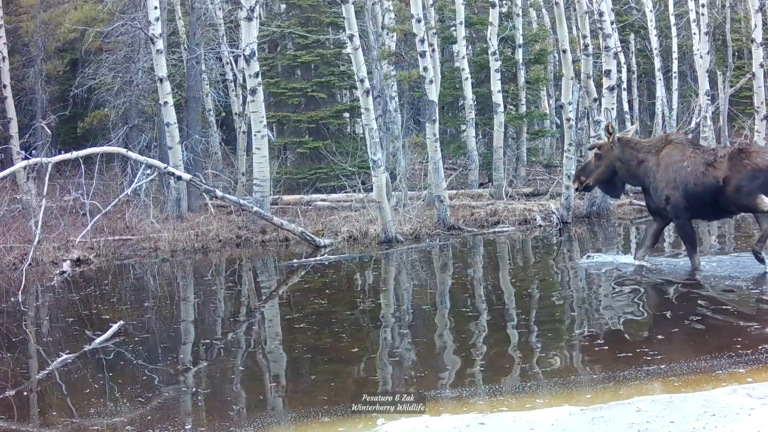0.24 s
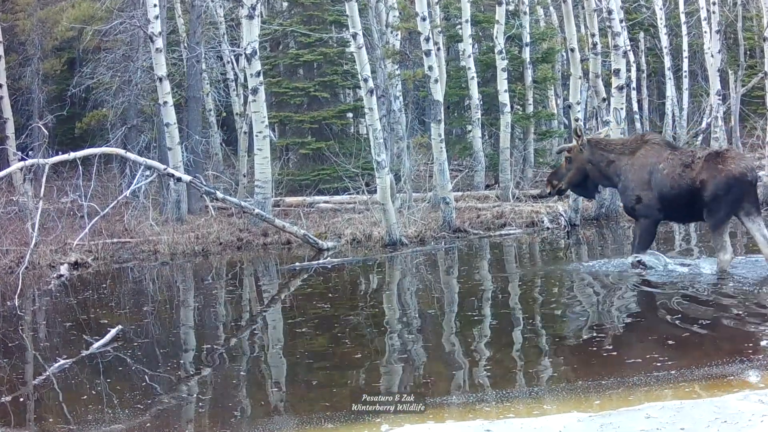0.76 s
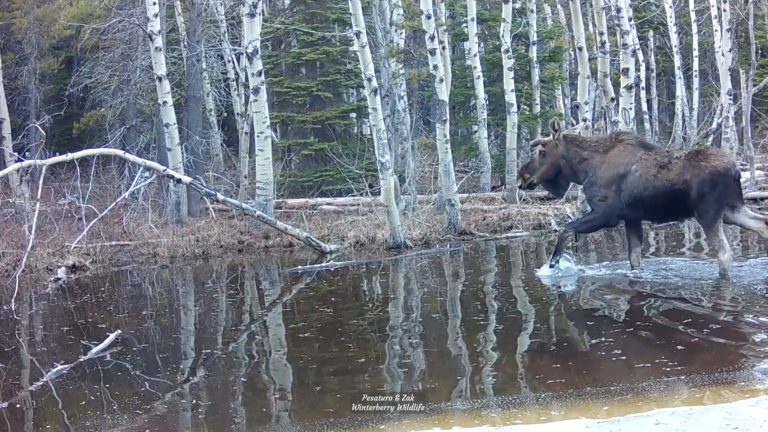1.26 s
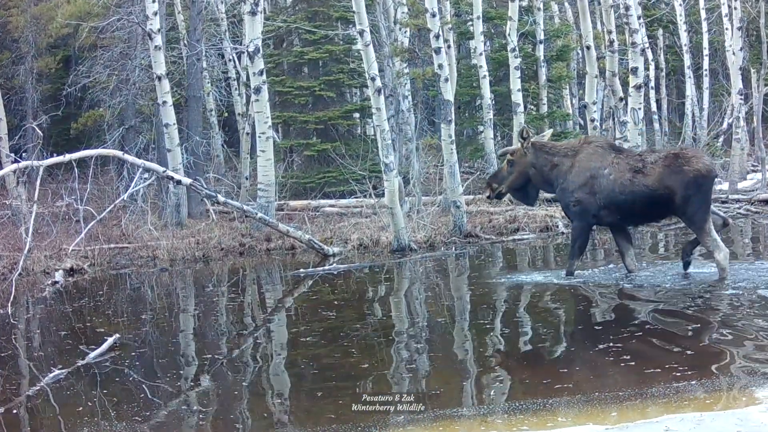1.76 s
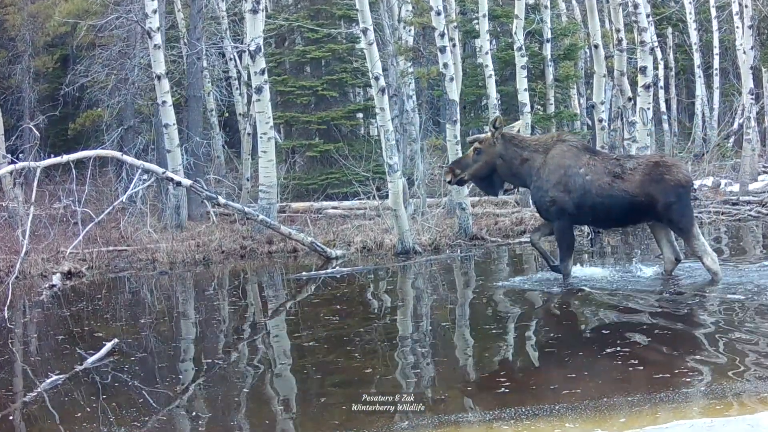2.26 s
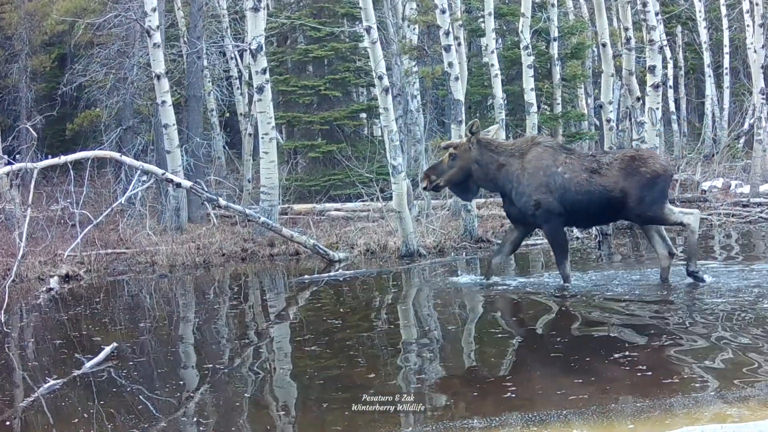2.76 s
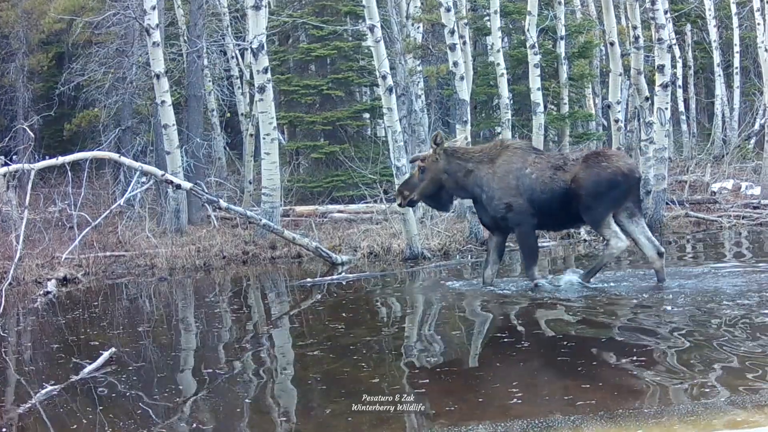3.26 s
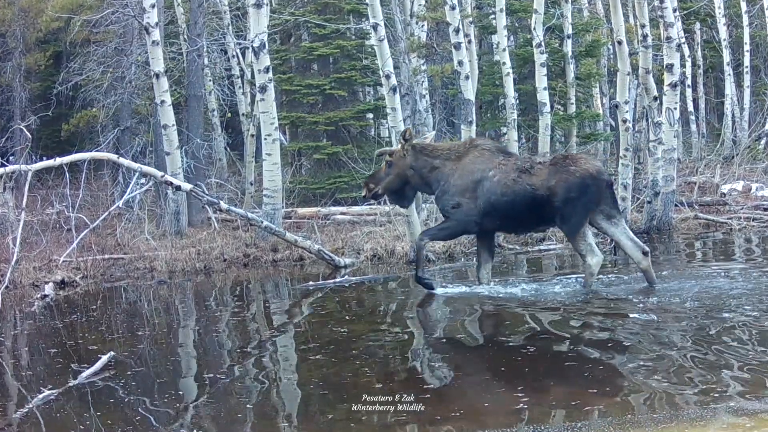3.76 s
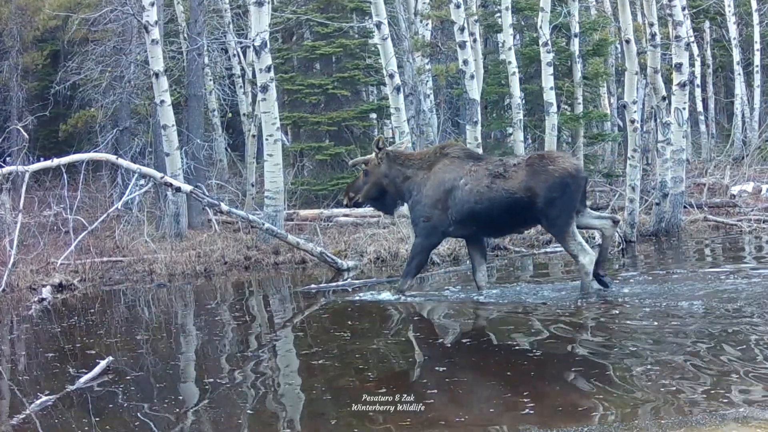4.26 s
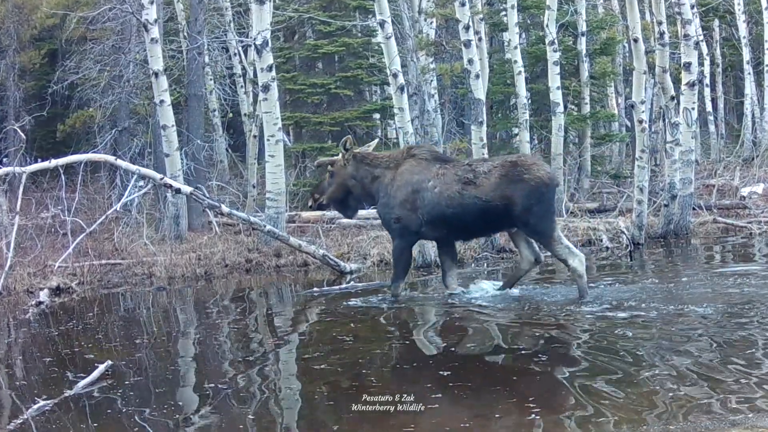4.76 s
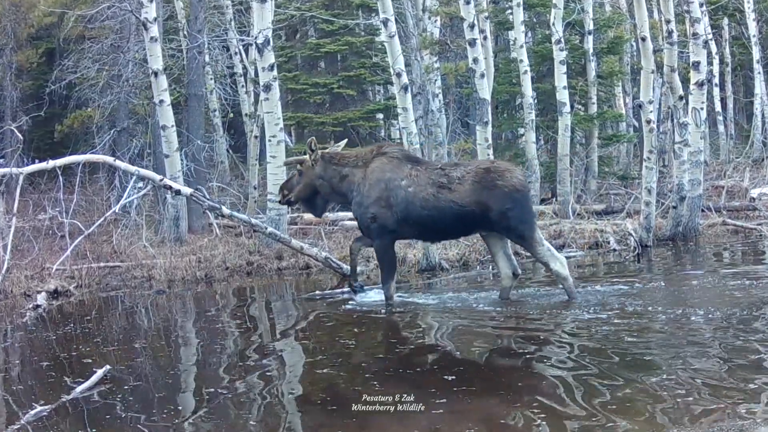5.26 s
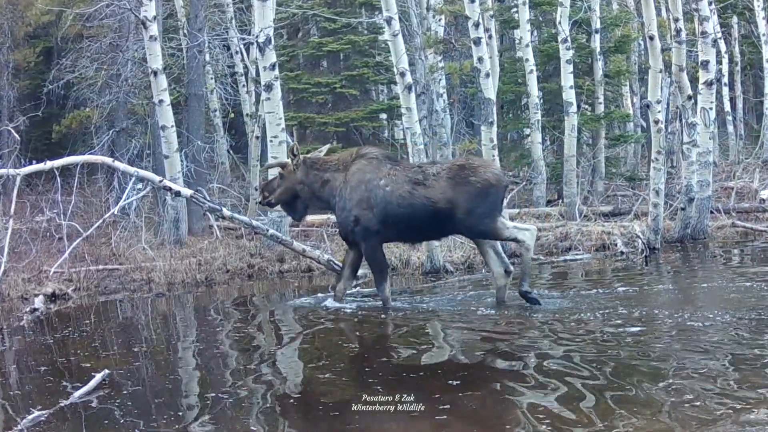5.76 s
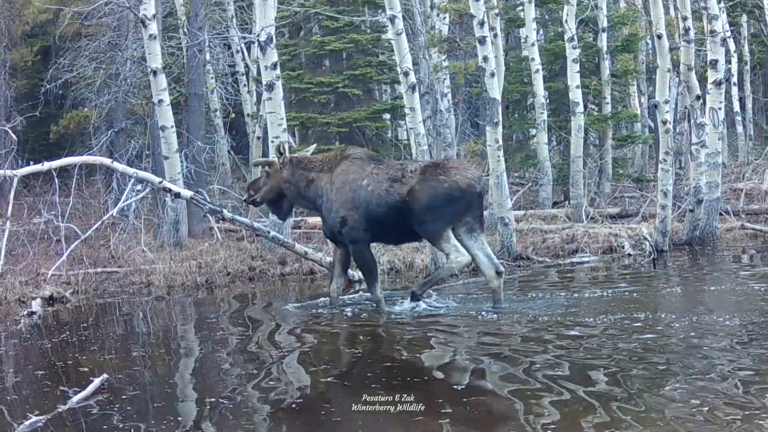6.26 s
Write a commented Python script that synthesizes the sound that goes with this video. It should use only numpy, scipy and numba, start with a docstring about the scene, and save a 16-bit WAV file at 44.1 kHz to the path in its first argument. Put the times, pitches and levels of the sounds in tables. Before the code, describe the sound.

A large hoofed animal wades steadily through shallow woodland water, each leg plunging with bubbly slaps, gurgles and small droplets over faint hiss.

```python
"""Splashing and bubbling: a large hoofed animal wades through a shallow woodland pool.
Legs churn up clouds of bubbles and spray, water slaps back, droplets tick, air pockets gulp shut; every
one of these bubbles is a decaying sine that climbs in pitch, and noise bursts add the crack of each slap.
The small boxed camera microphone stands some metres off: the trees return a short, quieter echo of dense
random reflections that die away, and the housing rings around 1-3 kHz over a faint noise hiss."""
import sys
import numpy as np
from scipy import signal
from scipy.fft import rfft, irfft
from scipy.io import wavfile
from scipy.ndimage import uniform_filter1d
from numba import njit

SR = 44100
rng = np.random.default_rng(int(sys.argv[2]) if len(sys.argv) > 2 else 0)


def to_wav(s):
    """Save 16-bit WAV."""
    ch = np.atleast_2d(s).T  # columns
    pcm = np.round(np.clip(ch, -1, 1) * 32767)  # PCM
    wavfile.write(sys.argv[1], SR, pcm.astype(np.int16))


N = 287091

# Legs plunging in, levels as at the microphone output: (time [s], air pocket level [dB],
# air pocket starting pitch [Hz], big bubbles level [dB], froth level [dB])
LEG_PLUNGES = [(0.127,-61,560,-54,-57), (0.223,-60,353,-46.5,-42), (.47,-56,620,-64,-49.5),
               (0.608,-45.5,690,-52.5,-58), (0.709,-40.5,640,-47.5,-44), (0.915,-42,707,-49.5,-57),
               (1.126,-54,585,-58.5,-44), (1.397,-42.5,532,-47,-67), (1.478,-57.5,370,-54,-57),
               (1.994,-45,710,-46.5,-55), (2.092,-44,690,-52,-47), (2.224,-52,610,-55,-42),
               (2.713,-55,515,-63,-45), (2.779,-66,634,-54,-47), (3.348,-47,770,-55.5,-64),
               (3.423,-47.5,384,-47,-61), (3.449,-45,643,-47.5,-40.5), (4.092,-45,460,-50,-52.5),
               (4.366,-54,300,-55,-56.5), (4.744,-58,770,-61.5,-63), (4.799,-73,594,-63,-49.5),
               (4.818,-51,527,-52,-68), (4.895,-53,434,-51,-45), (5.045,-49,746,-56.5,-49.5),
               (5.329,-53,690,-72,-48), (5.549,-67,660,-57,-49.5), (5.6,-58,457,-54,-47),
               (5.919,-58,630,-59.5,-59), (6.396,-52.5,432,-52,-47.5), (6.46,-68,466,-54,-77)]


def undb(db):
    """Decibels to an amplitude factor."""
    return 10 ** (np.asarray(db) / 20)


def mic_db(hz):
    """Gain in dB of the boxed microphone, interpolated over log frequency."""
    # Microphone in its housing: (frequency [Hz], gain [dB])
    response = np.array([(60, -54.5), (150, -50), (390, -23.5), (540, -14.5), (940, -10), (1060, -7),
                         (1280, -0.5), (1920, 0), (2120, -12.5), (2350, -5.5), (2750, -5.5), (3000, -10),
                         (4000, -20.5), (6300, -34), (10000, -44.5), (13000, -58)])
    return np.interp(np.log(np.maximum(hz, 1)), np.log(response[:, 0]), response[:, 1])


def mic(x):
    """Causal minimum-phase filter with the microphone's gain, built by folding the cepstrum."""
    gain = undb(mic_db(np.fft.rfftfreq(4096, 1 / SR)))
    cepstrum = irfft(np.log(gain))
    cepstrum[1:2048] *= 2
    cepstrum[2049:] = 0
    impulse = irfft(np.exp(rfft(cepstrum)))[:2048]
    return signal.fftconvolve(x, impulse)[:len(x)]


def walk(rate_hz):
    """Random levels held 1 / rate_hz s and smoothed twice over that time; standard deviation 1."""
    hold = int(SR / rate_hz)
    steps = np.repeat(rng.standard_normal(N // hold + 1), hold)
    smooth = uniform_filter1d(uniform_filter1d(steps, hold), hold)[:N]
    return smooth / np.std(smooth)


@njit
def ring(count, start, hz, t60, size, glide, rise):
    """Bubbles: sines that swell over rise cycles, fade 60 dB in t60 s and climb by the fraction glide."""
    out = np.zeros(count)
    for e in range(len(start)):
        span = int(t60[e] * SR) + 1
        phasor = size[e] + 0j
        step = np.exp(2j * np.pi * hz[e] / SR - np.log(1000) / span)  # turn and decay per sample
        climb = np.exp(2j * np.pi * hz[e] * glide[e] / SR / span)
        unswelled = 1.
        swell = np.exp(-hz[e] / SR / rise)
        for i in range(start[e], min(start[e] + span, count)):
            phasor, step, unswelled = phasor * step, step * climb, unswelled * swell
            out[i] += phasor.imag * (1 - unswelled)
    return out


def air_hiss():
    """Faint white noise in the air whose level wanders slowly."""
    level_db = -56 + 1.5 * walk(4.3)
    return rng.standard_normal(N) * undb(level_db)


def trees(x):
    """Trunks and bank scatter back a short diffuse tail: decaying noise of unit energy as echo."""
    echo_t60_s, echo_db, first_return_s = 0.3, -11.5, 0.006
    t = np.arange(int(.4 * SR)) / SR
    tail = rng.standard_normal(len(t)) * undb(-60 * t / echo_t60_s) * (t > first_return_s)
    tail = tail / np.sqrt(np.sum(tail ** 2))
    return signal.fftconvolve(x, tail)[:N] * undb(echo_db)


def drops():
    """A droplet landing ticks with five tiny bubbles of scattered pitch, within 8 ms."""
    # Single droplets landing: (time [s], nominal level at the microphone output [dB])
    landings = [(0.364, -48), (0.467, -45), (1.18, -43.5), (1.25, -48), (1.867, -55), (2.0054, -48),
                (2.1201, -46), (2.441, -41), (2.976, -51.5), (3.055, -51), (3.303, -54), (3.4213, -50),
                (4.802, -52), (4.8805, -51.5), (5.007, -53.5), (5.244, -52.5), (5.306, -55),
                (5.3746, -54.5), (6.3095, -59)]
    t60_s, lowest_hz, octaves, share_db = 0.0033, 3930, 1.5, -2
    s, db = (np.repeat(column, 5) for column in np.transpose(landings))
    pitch, delay = rng.random((len(s), 2)).T
    hz = lowest_hz * 2 ** (octaves * pitch)
    at = ((s + 0.008 * delay) * SR).astype(np.int64)
    size = undb(db + share_db - mic_db(5000))  # one microphone gain for every pitch
    return ring(N, at, hz, t60_s + 0 * s, size, 0.22 + 0 * s, 0.12)


def plinks():
    """Small bubbles pop up clear of the froth: one short climbing ring each."""
    # Lone bubbles: (time [s], nominal level at the microphone output [dB], starting pitch [Hz])
    pops = [(0.2847, -38, 2280), (0.614, -32.5, 2620), (1.1496, -36, 2310), (1.4005, -30.5, 2284),
            (1.8884, -33.5, 2320), (1.9944, -33, 2310), (2.9519, -34.5, 2430), (3.452, -38, 2290),
            (3.831, -31.5, 2680), (4.0949, -29.5, 2840), (4.1802, -37, 2470), (5.698, -38, 2700),
            (5.9803, -44, 2440)]
    t60_s, lift_db = 0.012, 1.5
    s, db, hz = np.transpose(pops)
    at = (s * SR).astype(np.int64)
    size = undb(db + lift_db - mic_db(hz))
    return ring(N, at, hz, t60_s + 0 * s, size, 0.036 + 0 * s, 1.9)


def gulps():
    """A large air pocket closes behind each plunge, rings low and climbs as it rises."""
    s, db, hz = np.transpose(LEG_PLUNGES)[:3]
    at = (s * SR).astype(np.int64)
    t60_s = 27 / hz  # 27 cycles, so bigger pockets ring longer
    return ring(N, at, hz, t60_s, undb(db - mic_db(hz)), 0.5 + 0 * s, 1.0)


def slaps():
    """Each slap traps one main bubble and six neighbours, with a broad crack of spray noise."""
    # Water slapping the surface, as at the microphone output: (time [s], main bubble level [dB],
    # main bubble starting pitch [Hz], spray level against the main bubble [dB])
    slap_table = [(0.0635, -35, 1410, -41), (0.156, -32, 1400, -46), (0.484, -30, 1280, -40),
                  (0.532, -34.5, 1440, -51), (0.6099, -31, 1326, -24.5), (0.7201, -30.5, 1476, -32),
                  (0.7774, -36, 1340, -37), (0.875, -32.5, 1510, -45), (0.8916, -29, 1415, -35),
                  (1.0589, -29, 1160, -53), (1.1162, -46, 1870, -31), (1.154, -31.5, 1300, -26),
                  (1.3996, -21, 1144, -44), (1.477, -33, 1230, -49), (1.5278, -30, 1410, -38.5),
                  (1.5556, -28, 1320, -36), (1.723, -32.5, 1310, -51), (1.8737, -39, 1490, -25.5),
                  (1.998, -28, 1746, -41), (2.0477, -30.5, 1376, -41), (2.1069, -29, 1020, -33.5),
                  (2.2178, -29, 1660, -44), (2.5231, -29, 1460, -42), (2.715, -31, 1580, -45),
                  (2.7836, -33, 1910, -42), (2.8212, -33, 1350, -44), (2.8521, -31.5, 1490, -30),
                  (2.9439, -32.5, 1670, -31), (3.3052, -37, 1635, -22), (3.358, -33, 1750, -27.5),
                  (3.4495, -35.5, 1630, -29.5), (3.4658, -26.5, 1470, -54), (3.4708, -28.5, 1440, -45),
                  (3.6016, -31.5, 1480, -32.5), (4.0077, -42.5, 1470, -45), (4.0948, -28.5, 1170, -32.5),
                  (4.1803, -30.5, 1230, -33.5), (4.2455, -34, 1314, -31), (4.4338, -34, 1410, -43),
                  (4.4884, -35, 1450, -63), (4.747, -38.5, 1240, -42), (4.825, -39, 1440, -25.5),
                  (4.88, -33.5, 1510, -32), (4.897, -32, 1230, -44), (4.9174, -30, 1200, -38),
                  (4.9276, -26, 1370, -44), (5.057, -31.5, 1285, -47), (5.0793, -32.5, 1530, -44),
                  (5.329, -32.5, 1340, -35), (5.528, -31, 1740, -46), (5.5872, -29.5, 1250, -54),
                  (5.6046, -25.5, 1483, -64), (5.629, -34.5, 1360, -49), (5.669, -40, 1640, -47),
                  (5.6872, -34.5, 1625, -32), (5.7342, -35, 1320, -31), (5.777, -49, 1770, -43),
                  (5.789, -40, 1250, -45), (5.805, -43, 1690, -41), (5.837, -39.5, 1500, -45),
                  (5.954, -47, 1400, -50), (6.1225, -49, 1720, -45), (5.93, -40, 1170, -57),
                  (6.1668, -40, 1570, -35), (6.186, -46, 1450, -57), (6.2798, -42.5, 1820, -24),
                  (6.3989, -26, 1296, -40), (6.442, -38, 1470, -36)]
    s, db, hz, spray_db = np.transpose(slap_table)
    t60_s = 0.023 + 0 * s
    at = (s * SR).astype(np.int64)
    main = ring(N, at, hz, t60_s, undb(db - mic_db(hz)), 0.11 + 0 * s, 1.36)

    pitch, delay = np.moveaxis(rng.random((len(s), 6, 2)), -1, 0)
    near_hz = hz[:, None] * 2 ** (2.4 * pitch - 1.3)  # 1.3 octaves below to 1.1 above
    late = at[:, None] + (0.39 * t60_s[:, None] * SR * delay).astype(np.int64)
    size = undb(db[:, None] - 9.5 - 0.88 * delay)  # later ones are weaker
    near = ring(N, late.ravel(), near_hz.ravel(), np.repeat(0.72 * t60_s, 6), size.ravel(),
                0.41 + 0 * size.ravel(), 0.11)

    t, gate = np.arange(N) / SR, 0
    for start, peak_db, fade_s in zip(s, db + spray_db, t60_s):
        fall_db = 60 * np.clip(t - start, 0, 1) / fade_s
        gate = gate + (t >= start) * undb(peak_db - fall_db)
    high_pass = signal.butter(2, 3000, "high", fs=SR, output="sos")
    crack = signal.sosfilt(high_pass, rng.standard_normal(N))
    return main + near + undb(-mic_db(7500)) * gate * crack  # spray level is set at 7500 Hz


def with_plunges(wash_db, peaks_db, fall_db_s):
    """Each plunge adds a quick swell that fades steadily; powers add to the wash. Returns dB."""
    rise_s = 0.0037
    power = undb(2 * wash_db)
    for start, peak_db in zip(np.array(LEG_PLUNGES)[:, 0], peaks_db):
        age = np.clip(np.arange(N) / SR - start, 0, 9)
        swell = (1 - np.exp(-age / rise_s)) ** 2
        power = power + swell * undb(2 * (peak_db - fall_db_s * age))
    return 10 * np.log10(power)


def cloud(heard_db, keep, lo_hz, hi_hz, count, cycles, spread_db, tilt):
    """Bubbles of mixed sizes, about a share keep of count sounding, levelled as at the microphone output."""
    when, pitch, life, luck, lot = rng.random((count, 5)).T
    at = (when * N).astype(np.int64)
    hz = lo_hz * (hi_hz / lo_hz) ** pitch
    # a positive spread makes a few much louder than the rest, a negative one a few much weaker
    size_db = np.minimum(-spread_db * np.log(1 - luck), 2.68 * spread_db)
    size = undb(size_db) * hz ** tilt
    sounding = np.clip(10 * (keep[at] - lot), 0, 1)
    size = size * sounding / np.sqrt(keep[at])  # fewer bubbles are made stronger
    bubbles = ring(N, at, hz, cycles * (.5 + life) / hz, size, 0.27 * life, 0.51)
    return bubbles / np.std(mic(bubbles)) * undb(heard_db)


def churn():
    """Four sizes of bubble; water arrives in clumps, so all surge together; all but the deepest flicker alone."""
    # Water streaming round the moving legs, as at the microphone output:
    # (time [s], froth level [dB], spray level against froth [dB])
    wash = [(0.0, -52.5, -15.5), (.2, -47, -14.5), (0.5, -51.5, -9.5), (0.84, -53.5, -9.5), (.95, -45, -14),
            (1.2, -47, -12.5), (1.361, -51, -12.5), (1.58, -49, -15), (1.851, -52, -12.5),
            (2.3, -51.5, -13.5), (2.45, -49, -10), (2.679, -50.5, -16), (3.26, -55, -8.5), (3.54, -52, -15),
            (3.804, -46, -12), (3.981, -56.5, -11.5), (4.201, -49, -18), (4.33, -54, -16), (4.68, -58, -12),
            (5.03, -54, -9), (5.102, -49, -16.5), (5.471, -55, -15), (5.7, -52.5, -12), (5.82, -58, -17.5),
            (5.99, -55.5, -14.5), (6.04, -60.5, -14.5), (6.3, -60, -8), (6.51, -49.5, -16)]
    big_fall_db_s, froth_fall_db_s, deep_fall_db_s = 157, 144.5, 247
    s, *columns = np.transpose(wash)
    wash_db, spray_db = (np.interp(np.arange(N) / SR, s, column) for column in columns)
    big_peak_db, froth_peak_db = np.transpose(LEG_PLUNGES)[3:]

    # wash offsets are against froth; plunge offsets against froth (spray) or big bubbles (deep slosh)
    big_db = with_plunges(wash_db - 14.5, big_peak_db, big_fall_db_s)
    froth_db = with_plunges(wash_db, froth_peak_db, froth_fall_db_s)
    spray_db = with_plunges(wash_db + spray_db, froth_peak_db - 18, froth_fall_db_s)
    deep_db = with_plunges(wash_db - 44.5, big_peak_db - 23, deep_fall_db_s)

    # below -50 dB of froth the bubbles get rarer, by 0.55 dB of density per dB of level
    keep = np.clip(undb(0.55 * (froth_db + 50)), .15, 1)
    surge_db = 1.48 * walk(14) + 0.67 * walk(70)
    big = cloud(surge_db + big_db + 1.4 * walk(34), keep, 144.3, 1035,
                count=7000, cycles=10.7, spread_db=3.0, tilt=0.95)
    froth = cloud(surge_db + froth_db + 0.63 * walk(30), keep, 980, 3600,
                  count=11000, cycles=22.5, spread_db=2.0, tilt=0.35)
    spray = cloud(surge_db + spray_db + 1.0 * walk(36), keep, 3440, 12000,
                  count=30000, cycles=9.7, spread_db=-3.5, tilt=1.0)
    deep = cloud(surge_db + deep_db, keep, 85, 288,
                 count=900, cycles=4.1, spread_db=-0.2, tilt=0.29)
    return deep + big + froth + spray


def scene():
    """The water, its echo from the trees, and the faint hiss of the air."""
    water = drops() + plinks() + gulps() + slaps() + churn()
    return (air_hiss() + trees(water) + water)[None]


def record(dry):
    """The housing colours everything, the preamp adds hiss, the top is cut."""
    preamp_db, top_hz = -88, 12800
    heard = mic(dry[0]) + undb(preamp_db) * rng.standard_normal(N)
    low_pass = signal.ellip(8, .2, 60, top_hz, fs=SR, output="sos")
    return signal.sosfilt(low_pass, heard)[None]


dry = scene()
out = record(dry)
to_wav(out)
```